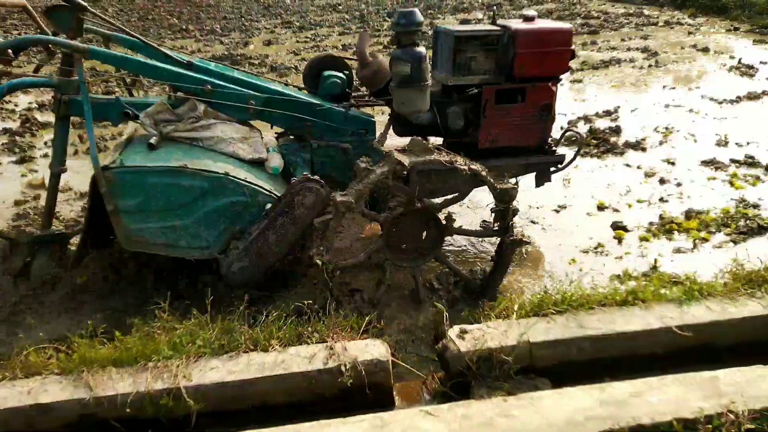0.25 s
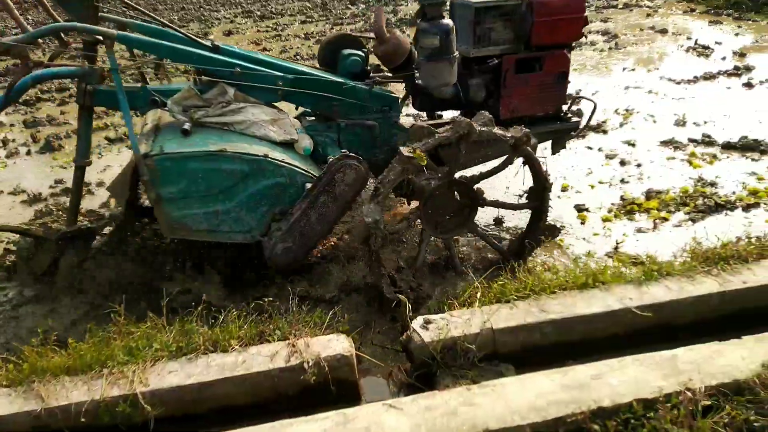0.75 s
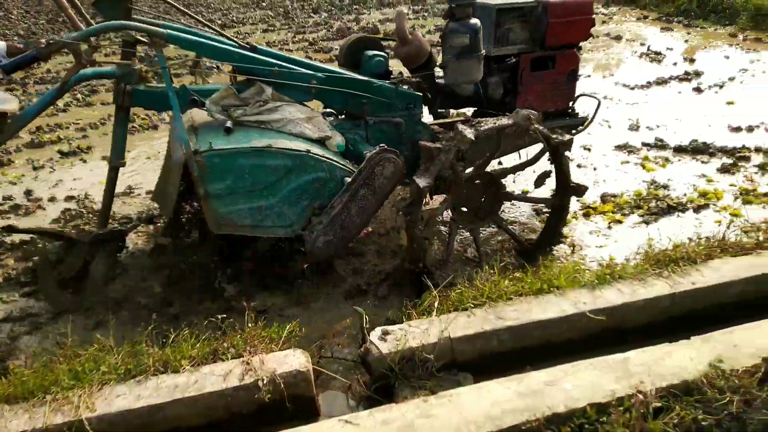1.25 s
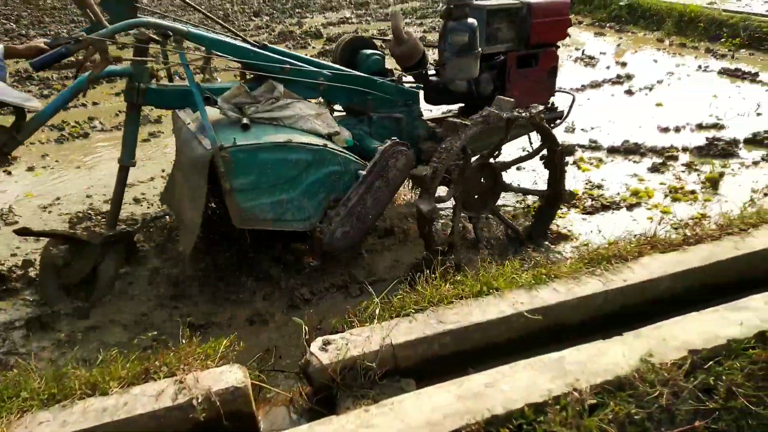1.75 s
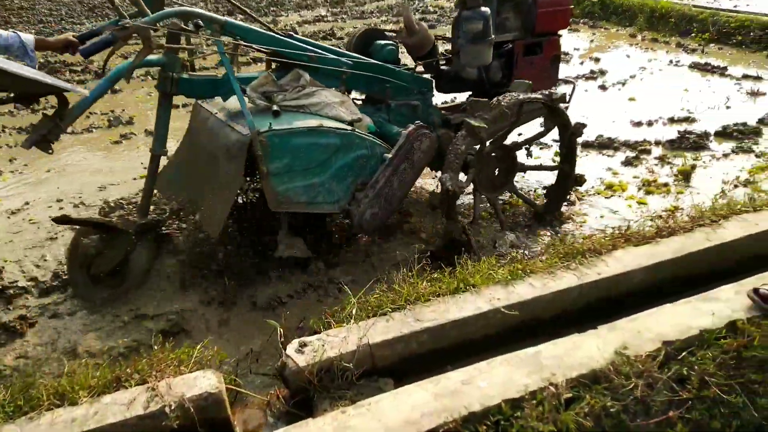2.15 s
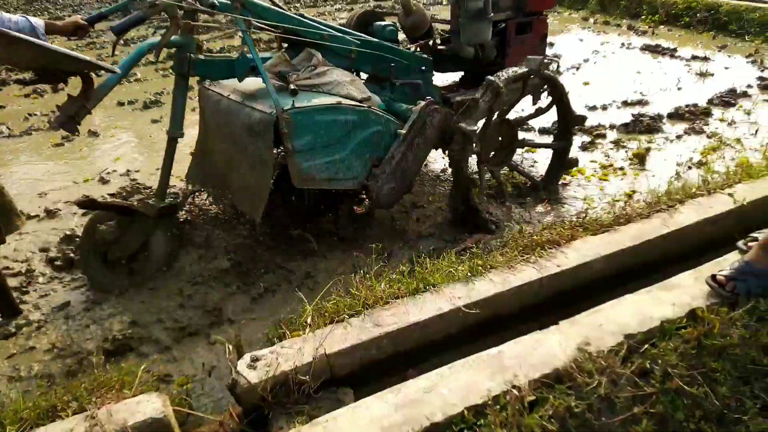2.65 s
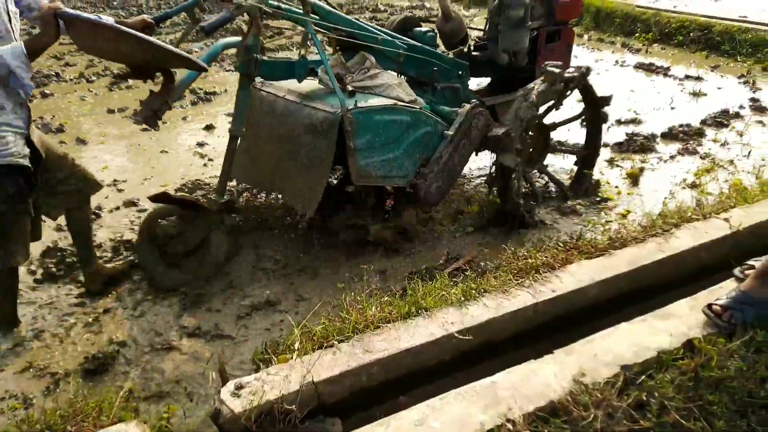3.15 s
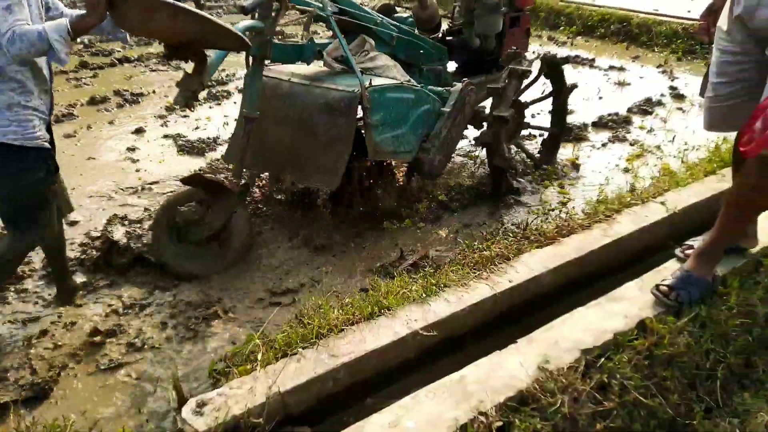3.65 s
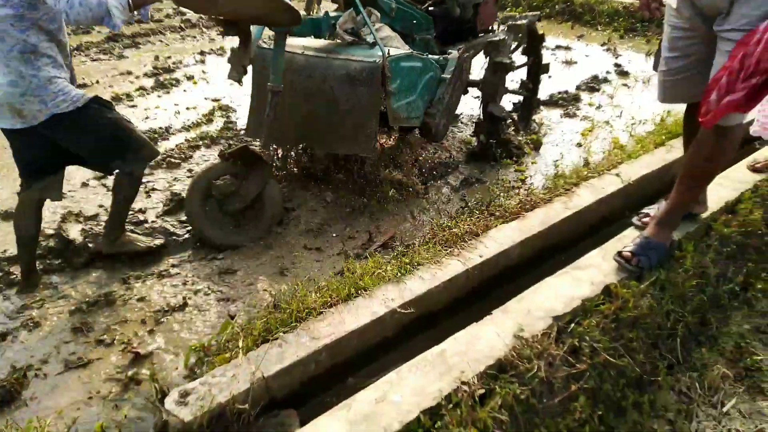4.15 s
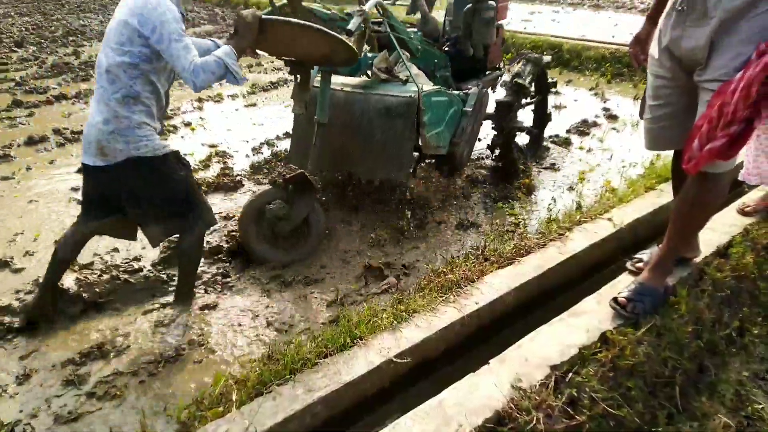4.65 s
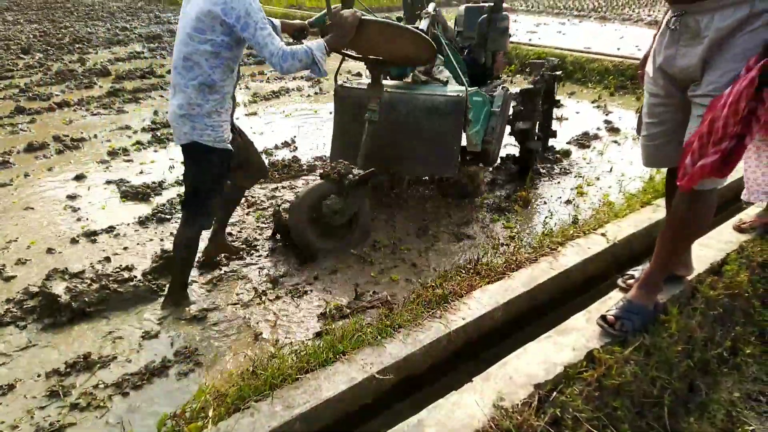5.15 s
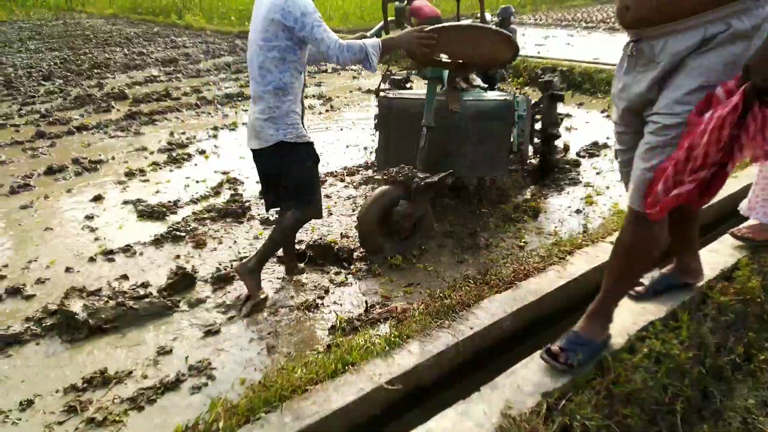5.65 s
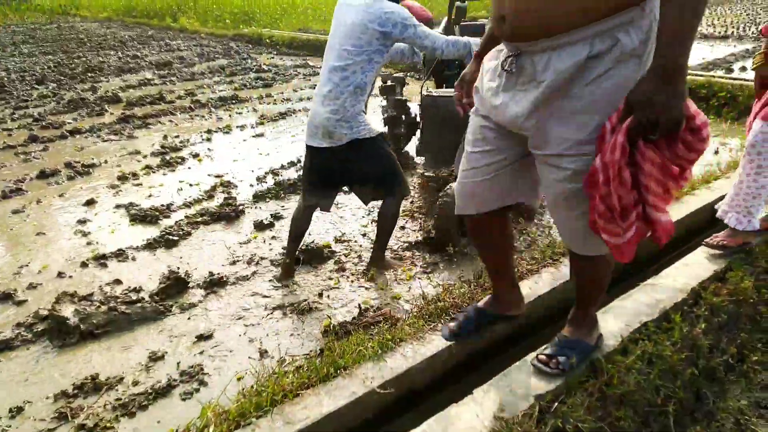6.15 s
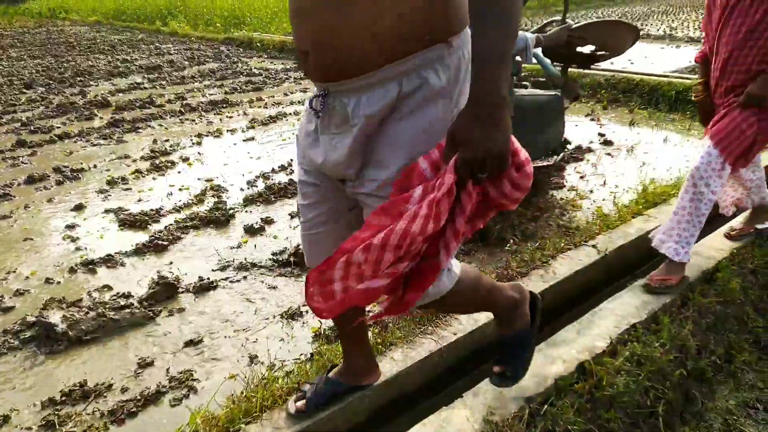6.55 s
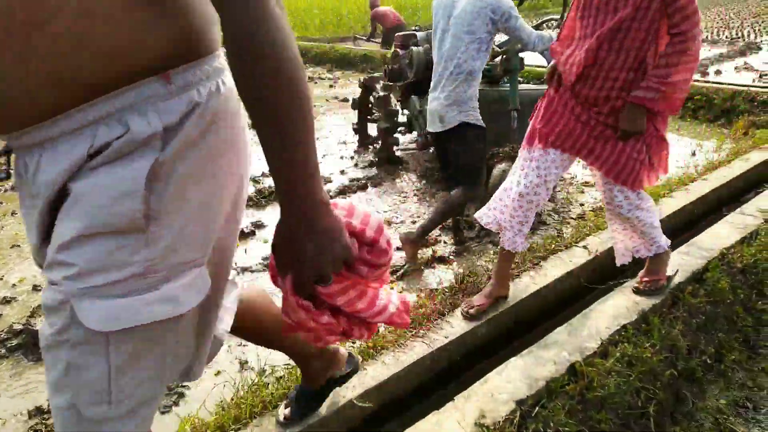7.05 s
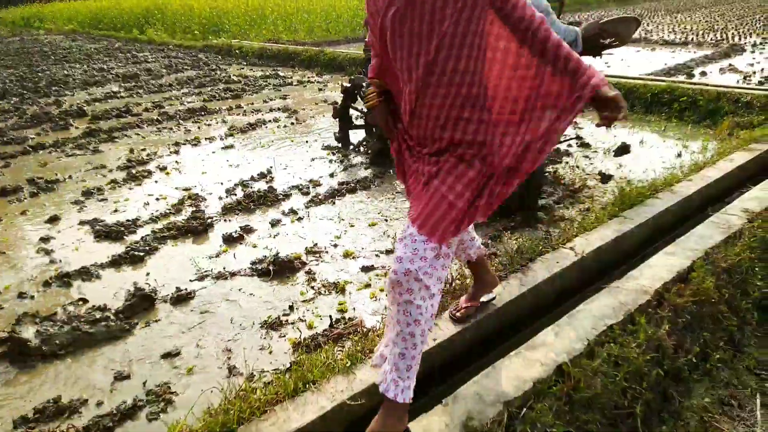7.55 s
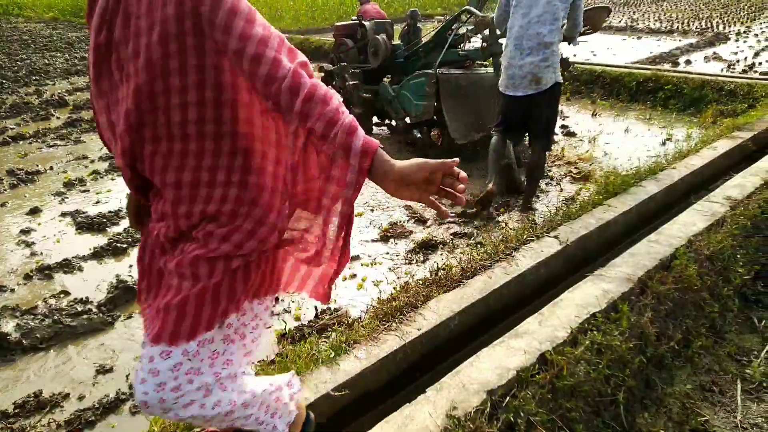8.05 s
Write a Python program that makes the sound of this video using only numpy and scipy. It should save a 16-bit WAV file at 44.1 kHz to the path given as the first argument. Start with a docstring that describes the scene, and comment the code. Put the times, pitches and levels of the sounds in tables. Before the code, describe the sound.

A walk-behind tiller's one-cylinder diesel engine chugs fast and evenly in an open flooded field. Deep exhaust thumps carry a loud metallic clatter, ringing knocks, valve ticks and jingling loose parts over a lumpy rumble. The hand-held microphone starts behind it, jumps to its side, then hears it pass and draw away. The engine speeds up slightly after the middle, the clatter thins a little, and one brief splash comes near the end.

```python
"""A flooded field, worked by a walk-behind tiller with a one-cylinder diesel, heard first from behind,
then beside it, then as it draws away. In each four-stroke cycle gas pulses thump the exhaust and intake,
metal contacts rattle the block and valve gear, and the firing knocks the casing and gear housing.
Loose parts jingle, a lumpy low rumble lies under the thumps, and there is one bright splash.
A hand-held two-port microphone listens from five positions: behind, beside, passing, leaving, far."""
import sys
import numpy as np
from scipy import signal
from scipy.fft import rfft, irfft, next_fast_len
from scipy.io import wavfile
from scipy.ndimage import uniform_filter1d, map_coordinates

SR = 44100
rng = np.random.default_rng(int(sys.argv[2]) if len(sys.argv) > 2 else 0)


def dump_mix(stems):
    """Bounce the given channels to the path in sys.argv[1] as a 16-bit WAV at rate SR."""
    frames = np.atleast_2d(stems).T  # one column per channel
    limited = np.clip(frames, -1, 1)  # hard clip at full scale
    pcm = np.round(limited * 32767).astype(np.int16)
    wavfile.write(sys.argv[1], SR, pcm)


N = 366471
TIME = np.arange(N) / SR
FFT_SIZE = next_fast_len(N + 8192)

# base mix, a row per position: (thump [dB], block [dB], sheet metal [dB], ticking [dB], hiss [dB])
MIX = [(-22.5, -28.5, -28.5, -36.5, -59), (-24, -25.5, -23.5, -36.5, -48.5),
       (-23.5, -26.5, -23.5, -38, -48.5), (-22.5, -28, -25, -40, -51), (-21.5, -30, -28.5, -43, -57)]
# ride on the clatter, dipping as passers-by screen the engine: (time [s], level [dB])
CLATTER_RIDE = [(0, 2.5), (.35, 2.5), (.375, -3), (.46, 1), (2.7, 0), (4.3, -1.5), (5.8, -1.5),
                (6.16, -2.5), (6.41, -2.5), (6.8, -1), (7.0, -1), (7.27, 2), (7.84, 0), (8.2, 3.5),
                (8.31, 4)]
# the clearest knocks: (time [s], level [dB], pitch [Hz], ticking relative to the knock [dB])
CLEAR_KNOCKS = [(0.0813, -20, 2250, -16), (0.2364, -14, 2380, -16), (0.3157, -10.5, 2190, -22),
                (0.4055, -10, 2350, -17), (0.4599, -16, 2260, -18), (0.4838, -10, 2240, -20),
                (0.5637, -7, 2230, -17), (0.6165, -8, 2380, -20), (0.6445, -11, 2350, -22),
                (0.7228, -9, 2330, -16), (0.7752, -11, 2370, -20), (0.8046, -7, 2330, -19),
                (0.8854, -8, 2350, -21), (1.2875, -11, 2210, -19), (1.4462, -12, 2180, -21),
                (1.4651, -12, 2450, -21), (1.5255, -15, 2340, -17), (1.6861, -7, 2180, -21),
                (1.7664, -3.5, 2480, -19), (1.9281, -11, 2300, -20), (2.413, -14, 2540, -17),
                (2.4838, -7, 2320, -12), (2.6958, -10, 2400, -19), (2.8111, -10, 2350, -19),
                (2.8884, -13, 2450, -17), (2.9697, -13, 2330, -19), (3.1318, -10.5, 2480, -21),
                (3.2096, -9, 2540, -19), (3.2895, -9.5, 2310, -19), (3.3703, -14, 2500, -19),
                (3.5309, -11, 2430, -21), (3.7614, -9, 2250, -20), (3.8537, -9, 2390, -19),
                (3.938, -9, 2280, -20), (4.0009, -7, 2400, -22), (4.16, -5, 2520, -24),
                (4.1794, -13, 2280, -19), (4.2328, -11, 2370, -18), (4.2593, -7.5, 2340, -22),
                (4.6294, -11, 2390, -18), (4.6983, -9.5, 2390, -24), (4.827, -14, 2430, -18),
                (5.0624, -11, 2306, -18), (5.2186, -9.5, 2280, -14), (5.2964, -9.5, 2280, -20),
                (5.4511, -9, 2240, -18), (5.6047, -11.5, 2250, -25), (5.8347, -12, 2350, -27),
                (6.0637, -9.5, 2360, -20), (6.2178, -13, 2240, -23), (6.7531, -20, 2360, -22),
                (7.1357, -13, 2310, -18), (7.2924, -15, 2310, -19), (7.3687, -13, 2320, -13),
                (7.4465, -11, 2350, -11), (7.5293, -12, 2230, -22), (7.6007, -11, 2240, -24),
                (7.678, -8, 2224, -24), (7.7553, -8.5, 2440, -24), (7.8326, -16, 2340, -21),
                (7.91, -13, 2310, -20), (7.9868, -17, 2250, -13), (8.1414, -7, 2330, -11),
                (8.2198, -12, 2350, -16)]
# the microphone ports differ in colour: (frequency [Hz], left minus right [dB])
PORT_TILT = [(60, -1.0), (92, -1.0), (140, -1.5), (210, -2.5), (330, -1.5), (500, -2), (770, -3.5),
             (1170, -7), (1790, -12.5), (2740, -8.5), (4190, 0.5), (6410, -9), (9810, 2.5), (15000, 11)]
# the left port leads beside the engine: (frequency [Hz], phase [rad])
LEFT_LEAD = [(900, -.1), (1250, -.1), (1800, .6), (2400, 1.2), (3000, 2.4), (5500, 3)]


def exhaust_thumps():
    """Gas pulses ring the silencer and block, a little differently in every cycle."""
    # silencer and block modes: (frequency [Hz], t60 [s])
    modes = [(71, 0.108), (126, 0.039), (171, 0.039), (230, 0.043), (276, 0.14), (319, 0.075), (381, 0.043),
             (430, 0.05), (698, 0.045)]
    # gas pulses at each position: (phase [cycles], then a signed push on each mode [gain]); the rows are
    # combustion, exhaust opening, its inverted return from the open pipe end, valve overlap, intake closing
    behind = [(-0.367, 0.02, -0.04, -0.03, -0.03, -0.04, 0.06, 0.01, 0, 0.07),
              (-0.109, -0.2, 0.15, 0.11, 0.05, 0.0, 0.09, 0.01, 0, -0.03),
              (-0.072, 0.2, -0.22, 0.04, -0.03, -0.02, -0.1, 0.0, 0, 0.01),
              (0.172, -0.07, -0.1, 0.11, 0.07, 0.02, -0.01, -0.01, 0, 0),
              (0.455, -0.01, -0.11, -0.04, 0.04, 0, 0, -0.02, 0, 0)]
    beside = [(-0.367, 0.0, 0.02, -0.01, -0.06, 0.02, -0.01, -0.02, -0.03, 0.0),
              (-0.109, -0.2, 0.19, 0.11, 0.06, -0.01, 0.09, -0.15, 0.0, -0.05),
              (-0.072, 0.11, -0.01, 0.07, -0.04, 0.0, -0.07, 0.08, 0.03, 0.04),
              (0.172, 0.03, 0.02, -0.12, 0.08, -0.01, 0.03, 0.04, -0.04, -0.01),
              (0.455, 0.04, 0.02, -0.07, -0.12, 0.03, 0.0, 0.01, 0.0, -0.01)]
    passing = [(-0.367, 0.01, -0.01, 0.0, -0.08, -0.01, -0.02, -0.06, 0.02, 0.01),
               (-0.109, -0.16, -0.01, 0.29, -0.01, 0.0, 0.05, -0.01, 0.0, -0.01),
               (-0.072, 0.15, -0.23, 0.24, -0.05, 0.01, -0.02, 0.01, 0.03, -0.01),
               (0.172, 0.01, -0.01, -0.03, 0.05, 0.0, 0.03, 0.11, -0.03, -0.01),
               (0.455, 0.03, -0.05, -0.03, -0.11, 0.04, 0.0, 0.0, 0.0, 0.01)]
    leaving = [(-0.367, 0.0, -0.01, -0.04, -0.03, -0.01, -0.02, 0.0, 0.0, 0.0),
               (-0.109, -0.24, -0.15, 0.54, -0.03, -0.05, -0.07, 0.1, -0.07, -0.04),
               (-0.072, 0.19, -0.22, 0.37, -0.02, 0.03, 0.06, -0.06, -0.01, 0.02),
               (0.172, -0.02, -0.15, 0.13, 0.1, -0.03, 0.02, 0.03, -0.06, 0.01),
               (0.455, 0.03, -0.07, -0.08, 0.02, 0.01, -0.01, -0.02, -0.01, -0.01)]
    far = [(-0.367, -0.01, -0.01, -0.08, 0.03, 0.01, 0.05, -0.02, -0.02, 0.01),
           (-0.109, -0.17, -0.12, 0.35, 0.08, -0.01, -0.03, 0.04, -0.08, -0.01),
           (-0.072, 0.18, -0.27, 0.24, -0.04, -0.01, 0.02, -0.09, 0.03, 0.02),
           (0.172, -0.04, -0.15, 0.17, 0.18, -0.01, 0.0, -0.01, -0.05, 0.01),
           (0.455, 0.02, -0.16, -0.06, 0.09, -0.01, 0.0, 0.01, -0.02, 0.0)]
    # tone of the thumps, with a lift in the low mids: (frequency [Hz], gain [dB])
    tone = [(70, 0), (130, 1), (230, 2), (320, 3.5), (400, 1.5), (470, -1), (530, -3), (700, 3.5)]
    firing_spread_db, mode_spread_db = [.6, 1.2, 1.3, .8, .4], .4  # per position; per mode and pulse
    firing_db = firing_spread_db @ position_mix(TIME) * wobble(11)
    strikes, t = np.zeros((len(modes), N)), TIME[:SR // 5]
    for pulse in np.stack([behind, beside, passing, leaving, far], axis=1):
        times = cycle_times(pulse[0, 0])
        scatter = rng.standard_normal((len(times), len(modes) + 1))
        times = times + .0001 * scatter[:, 0]
        push_db = mode_spread_db * scatter[:, 1:] + np.interp(times, TIME, firing_db)[:, None]
        pushes = position_mix(times).T @ pulse[:, 1:] * amp(push_db)
        strikes += [impulses(times, push) for push in pushes.T]
    rings = [damped_sine(hz, t60, t) for hz, t60 in modes]
    thumps = signal.oaconvolve(strikes, rings, axes=1).sum(0)[:N]
    thumps = signal.lfilter(*signal.butter(2, 50, "high", fs=SR), thumps)
    thumps = filtered(thumps, lambda hz: port_gains(hz) * amp(along(tone, hz)))
    return levelled(thumps, layer_levels()[0])


def contact_envelopes():
    """Metal contacts swell four bands in every cycle: block, sheet metal, ticking and hiss."""
    # contacts: (phase [cycles], t60 [s], then each band's level over the steady rattle [dB])
    contacts = [(-.31, 0.068, 8, 8, 7.5, 4), (-.085, 0.02, 6, 7.5, 7, -11), (.17, 0.064, -5, -8, 4, 6),
                (.35, 0.024, 7, 5, -15, -9), (.47, 0.055, 3, -28.5, -19, 2)]
    # the firing carries far, the valve gear less; a row per contact: (gain at each position [dB])
    facing = [(0, -2.5, -2, -1.2, 1), (0, 0, -0.5, -1.4, -3), (0, 1, 0, -0.088, -0.5), (0, 0, -1, -1, 0.5),
              (0, 0, 0, 0, 4.5)]
    # once the tiller has turned away; a row per contact: (change in each band [dB])
    turned = [(-5, -1, -1, -3), (-4, -3, -5, -.1), (-8, -17, -6, 1.5), (-3, -0.5, 12, -.1),
              (-2.5, .1, .1, 0)]
    # the sharpest valve ticks: (time [s], peak [dB])
    valve_ticks = [(0.278, -34), (0.4424, -35), (1.0026, -36), (1.3246, -40), (1.4047, -39), (1.7255, -35),
                   (1.8068, -38), (3.5675, -36), (3.8911, -42), (3.9714, -40), (5.254, -40), (5.4864, -36)]
    power = amp([1.1 * wobble(30) + 1.2 * wobble(7) for _ in range(4)])
    for (phase, t60, *band_db), facing_db, turned_db in zip(contacts, facing, turned):
        times = contact_times(phase)
        position = position_mix(times)
        scatter = rng.standard_normal((len(times), 6))
        hit_db = band_db + np.outer(position[3:].sum(0), turned_db) + (facing_db @ position)[:, None]
        hit_db += .6 * (scatter[:, :1] + scatter[:, 2:])
        times = times + .0004 * scatter[:, 1]
        power += [decay(impulses(times, hits), t60 / 2) for hits in amp(2 * hit_db).T]
    # all but the hiss duck just before the firing
    lull_times, lull_s, lull_db = contact_times(-.4), .009, -4
    lull_shape = np.hanning(round(lull_s * SR)) ** .5
    lull = signal.oaconvolve(impulses(lull_times, np.ones(len(lull_times))), lull_shape)[:N]
    power[:3] *= amp(2 * lull_db * lull)
    block, sheet, ticking, hiss = [levelled(np.sqrt(band)[None], db)[0]
                                   for band, db in zip(power, layer_levels()[1:])]
    # clear knocks set off extra rattle; valve ticks spike the hiss
    times, knock_db, _, ticking_db = np.transpose(CLEAR_KNOCKS)
    sheet = np.hypot(sheet, decay(impulses(times, amp(knock_db - 16)), t60=.056))
    ticking = np.hypot(ticking, decay(impulses(times, amp(knock_db + ticking_db - 11)), t60=.025))
    times, tick_db = np.transpose(valve_ticks)
    hiss = np.hypot(hiss, decay(impulses(times, amp(tick_db - 3)), t60=.02))
    return block, sheet, ticking, hiss


def engine_rattle():
    """Block, sheet metal and valve gear rattle: bands of noise pulsing with the metal contacts."""
    # rattle colour at each position, notched by the echo off the water: (frequency [Hz], level [dB])
    colours = [
        [(240, -47), (400, -9), (450, -7), (650, -2), (960, -8.5), (1300, -10.5), (1800, -6), (2280, 2),
         (2800, -11.5), (4200, -24.5), (5200, -33.5), (7000, -44), (9100, -54), (15400, -120)],
        [(240, -33), (400, -7), (462, -1), (527, -20), (601, -7), (661, -7.5), (755, 0.5), (936, -3),
         (1310, -11.5), (1620, -9), (1990, -3.5), (2410, -0.5), (2850, -15.5), (4950, -27), (7000, -41.5),
         (9100, -54), (15400, -120)],
        [(240, -32), (400, -3.5), (496, -16), (773, 2), (882, -1), (959, -0.5), (1200, -11), (1360, -13.5),
         (1640, -3.5), (2040, -3.5), (2380, 0), (2960, -14), (3450, -23), (3850, -18.5), (4250, -23.5),
         (4950, -25), (7000, -39), (9100, -77), (15400, -120)],
        [(240, -24), (400, -6), (473, -13), (502, -16.5), (719, -2.5), (1010, -7.5), (1090, -6.5), (1570, -16),
         (1770, -6), (2240, -2), (2650, -11), (3100, -19.5), (3490, -24.5), (4890, -29), (7000, -41),
         (9100, -81), (15400, -120)],
        [(240, -37), (400, -1.5), (446, -10), (496, -9), (540, -16.5), (728, -2.5), (903, -2), (1130, -10),
         (1320, -10), (1600, -14.5), (2300, -2), (2820, -11), (3140, -19), (3850, -20.5), (7000, -37),
         (9100, -89), (15400, -120)],
    ]
    # sheet metal resonances: (frequency [Hz], width [Hz], gain [dB])
    resonances = [(2205, 27, -1), (2327, 29, 5), (2420, 230, 2), (2460, 42, 2.5)]
    # colour of the hiss: (frequency [Hz], level [dB])
    hiss_colour = [(6500, -30), (7300, -10), (8200, -17), (9000, -13), (9800, 0), (12000, -1), (15000, -3),
                   (15700, -6)]
    noise = rng.standard_normal((2, N))
    views = [unit(at_ports(noise, colour, lead)) for colour, lead in zip(colours, [.55, 1, 1, 1, .54])]
    steady = np.sum(np.sqrt(position_mix(TIME))[:, None] * views, 0)
    hiss = at_ports(rng.standard_normal((2, N)), hiss_colour)
    *envelopes, hiss_envelope = contact_envelopes()
    out = hiss_envelope * hiss / np.std(hiss.mean(0))

    def ring(hz):
        return 1 + sum((amp(db) - 1) / (1 + (2 * (hz - centre) / width) ** 2)
                       for centre, width, db in resonances)

    edges_hz = [0, 1500, 3300, SR]
    for envelope, low, high in zip(envelopes, edges_hz, edges_hz[1:]):
        rolloff = lambda hz: np.sqrt((1 + (low / (hz + 1)) ** 16) * (1 + (hz / high) ** 16))
        band = filtered(steady, lambda hz: ring(hz) / rolloff(hz))
        # so many parts rattle together that chance swells partly even out
        swells = np.abs(uniform_filter1d(np.mean(band ** 2, 0), round(.004 * SR)))
        band = band / (swells + .1 * np.var(band)) ** .15
        slow_rms = np.sqrt(uniform_filter1d(band.mean(0) ** 2, SR // 2))
        out += envelope * band / slow_rms
    return out


def casing_knocks():
    """Each firing rings the casing modes at new strengths; the clearest knocks have their own pitch."""
    # casing modes: (frequency [Hz], level [dB], t60 [s])
    modes = [(1920, -16, .015), (2220, -13, 0.023), (2330, 1, 0.047), (2384, -2, 0.017), (2510, -9, 0.028),
             (2980, -5, 0.017), (3350, -12, 0.011), (3750, -15, 0.014)]
    # how much the usual knock stands out: (gain at each position [dB])
    bite = [-13, -3.5, -10, -1, 2]
    usual_hz, over_sheet_db, ride_depth = 2340, 12, 2.3
    clear = np.array(CLEAR_KNOCKS)[:, :3]
    firings = contact_times(-.305)
    gap_s = np.abs(firings[:, None] - clear[:, 0]).min(1)
    firings = firings[gap_s > .008]  # a clear knock takes the firing's place
    usual_db = (np.transpose(MIX)[2] + bite) @ position_mix(firings) + over_sheet_db
    usual_db += ride_depth * np.interp(firings, *np.transpose(CLATTER_RIDE))
    usual_db += .8 * rng.standard_normal(len(firings))
    usual = np.c_[firings, usual_db, np.full(len(firings), usual_hz)]
    out, t = np.zeros(N + SR), TIME[:SR // 16]
    attack = 1 - np.exp(-(t / .0012) ** 2)
    for start, knock_db, pitch in [*usual, *clear]:
        ring = sum(amp(db + rng.normal(0, .9))
                   * damped_sine(hz * pitch / usual_hz * rng.normal(1, .004), t60, t)
                   for hz, db, t60 in modes)
        out[round(start * SR):][:len(t)] += amp(knock_db - 6) * ring * attack  # room for the summed modes
    return filtered(out[:N], lambda hz: port_gains(hz, lead=.7))


def housing_knocks():
    """Each firing also knocks the hollow gear housing."""
    # housing modes: (frequency [Hz], level [dB], t60 [s])
    modes = [(770, -1, .04), (843, -4, 0.046), (962, -1.5, 0.034)]
    # strength of the blow: (level at each position [dB])
    blow_db = [-33, -26.5, -19, -26, -29.5]
    times, t = contact_times(-.31), TIME[:SR // 16]
    attack = 1 - np.exp(-t / .0011)
    out = np.zeros(N)
    for hz, db, t60 in modes:
        blows = amp(blow_db @ position_mix(times) + db + 1.5 * rng.standard_normal(len(times)))
        out += signal.oaconvolve(impulses(times, blows), damped_sine(hz, t60, t) * attack)[:N]
    return filtered(out, port_gains)


def frame_chinks():
    """Loose parts of the frame jingle: short high pings, a few clear ones among many strewn at random."""
    # the clearest chinks: (time [s], level [dB], pitch [Hz])
    clear = [(0.0189, -23, 3540), (0.16, -27, 3680), (0.285, -16, 3580), (0.5003, -21, 3800),
             (0.6853, -25, 3760), (0.844, -26, 4180), (1.0829, -24, 3770), (1.1263, -23, 3480),
             (1.3663, -26, 3700), (1.5249, -21, 3740), (1.6107, -17, 3600), (2.0482, -21, 3600),
             (2.247, -27, 3780), (2.2922, -27, 3970), (2.4124, -23, 4020), (2.483, -21.5, 4800),
             (2.9706, -29, 3940), (3.8524, -27, 3660), (4.378, -24, 3820), (4.6558, -23, 3940),
             (4.957, -13, 3030), (5.162, -18, 2800), (5.36, -13, 2400), (7.0582, -24, 3500)]
    count, over_ticking_db, db_per_khz, t60 = 250, 8, -4, .018
    when, strength, height, _ = rng.random((count, 4)).T
    times, khz_up = when * TIME[-1], 2.2 * height
    db = np.interp(times, TIME, layer_levels()[3]) + over_ticking_db
    db += db_per_khz * khz_up - 1.5 * np.log(strength)
    strewn = np.c_[times, db, 3300 + 1000 * khz_up]
    times, db, hz = np.r_[strewn, clear].T[..., None]
    t = TIME[:SR // 40]
    pings = amp(db) * damped_sine(hz, t60, t) * (1 - np.exp(-t / .00069))
    samples = (times * SR).astype(int) + np.arange(len(t))
    pan = rng.uniform(-1, 1, times.shape)
    return np.array([np.bincount(samples.ravel(), (pings * gain).ravel(), N + SR)[:N]
                     for gain in (1 + pan, 1 - pan)])


def low_rumble():
    """A lumpy low rumble under the engine's thumps."""
    # colour of the rumble: (frequency [Hz], level [dB])
    colour = [(25, -34), (60, -7.5), (110, -3), (160, -2), (240, -3), (330, -4.5), (410, -5), (470, -11.5),
              (520, -25), (600, -42)]
    # loudness of the rumble: (level at each position [dB])
    rumble_db = [-34, -31.5, -31, -33, -34]
    rumble = unit(at_ports(rng.standard_normal((2, N)), colour))
    return rumble * amp(rumble_db @ position_mix(TIME) + 1.45 * wobble(2.83) + 2 * wobble(18))


def splash():
    """A short wet burst, mostly treble."""
    # the splash: (time [s], level [dB], t60 [s])
    burst = (6.875, -37, 0.17)
    start, db, t60 = burst
    # colour of the spray: (frequency [Hz], level [dB])
    colour = [(2500, -30), (4000, -10), (5500, 2), (7000, -9), (9000, -16), (11000, -7), (15000, -25)]
    spray = filtered(rng.standard_normal((2, N)), lambda hz: amp(along(colour, hz)))
    envelope = uniform_filter1d(decay(impulses(np.array([start]), [1]), t60), SR // 60)
    return amp(db) * unit(spray) * envelope


def cycle_times(phase):
    """Times at which the engine passes this phase of each four-stroke cycle."""
    # engine speed, picking up as the load eases: (time [s], rate [cycles/s])
    speed = [(0, 12.768), (.385, 12.768), (.385, 12.481), (.8, 12.476), (1.2, 12.467), (1.5, 12.417),
             (1.8, 12.54), (2.05, 12.392), (2.35, 12.433), (2.65, 12.596), (2.9, 12.565), (3.1, 12.468),
             (3.6, 12.386), (4.1, 12.418), (4.4, 12.37), (4.8, 12.508), (5.0, 12.363), (5.2, 12.894),
             (5.4, 13.002), (5.75, 13.061), (6.1, 13.109), (6.4, 13.08), (6.8, 13.011), (7.1, 12.903),
             (7.4, 12.997), (7.7, 12.945), (8.31, 12.853)]
    start_phase, cut_s, skip_cycles = .669, .385, .126  # the beat skips at an abrupt cut to a new position
    cycles = start_phase + np.cumsum(automation(speed)) / SR - skip_cycles * (TIME > cut_s)
    cycles = np.maximum.accumulate(cycles)
    whole = np.arange(np.ceil(cycles[0] - phase), cycles[-1] - phase)
    return np.interp(whole + phase, cycles, TIME)


def contact_times(phase):
    """Times at which a metal contact at this phase of the cycle is heard."""
    # the block is heard later than the pipe: (delay at each position [s])
    lag = [.002, .0005, .001, .002, .002]
    times = cycle_times(phase)
    return times + lag @ position_mix(times)


def position_mix(times):
    """Crossfade weights of the five listening positions at these times."""
    # listening position: (time [s], position [0 behind, 1 beside, 2 passing, 3 leaving, 4 far behind])
    path = [(0, 0), (.37, 0), (.385, 1), (1.8, 1), (3.2, 2), (4.7, 2), (5.4, 3), (5.9, 3), (6.6, 4)]
    position = np.interp(times, *np.transpose(path))
    return np.clip(1 - np.abs(position - np.arange(5)[:, None]), 0, 1)


def layer_levels():
    """Levels in dB of thump, block, sheet metal, ticking and hiss over time."""
    # how strongly the layers follow the clatter ride: (depth for each layer [factor])
    ride_depth = [0, .3, 1, 1.3, 1.8]
    return np.transpose(MIX) @ position_mix(TIME) + np.outer(ride_depth, automation(CLATTER_RIDE))


def port_gains(hz, lead=0):
    """Left and right port responses, with this share of the left port's phase lead."""
    left = amp(along(PORT_TILT, hz) / 2) * np.exp(.5j * lead * along(LEFT_LEAD, hz))
    return np.array([left, 1 / left])


def at_ports(noise, colour, lead=0):
    """Two unrelated noises, coloured and blended as the ports hear them: narrow lows, wide highs."""
    # likeness of the two ports: (frequency [Hz], coherence [0-1])
    likeness = [(40, .85), (100, .97), (250, .99), (500, .96), (900, .97), (1300, .85), (1800, .65),
                (2400, .64), (3300, .45), (4700, .2), (10000, .05)]
    hz = np.fft.rfftfreq(FFT_SIZE, 1 / SR)
    width = np.arccos(np.clip(along(likeness, hz), 0, 1)) / 2
    left, right = port_gains(hz, lead)
    gain = amp(along(colour, hz)) * 2 / np.abs(left + right).clip(1)
    mid, side = rfft(noise, FFT_SIZE) * [np.cos(width), np.sin(width)] * gain
    return irfft([(mid + side) * left, (mid - side) * right], FFT_SIZE)[:, :N]


def amp(db):
    return 10 ** (np.asarray(db) / 20)


def unit(x):
    return x / np.sqrt(np.mean(x ** 2) + 1e-20)


def along(points, hz):
    """A curve through (frequency [Hz], value) points on a log axis."""
    freqs, values = np.transpose(points)
    return np.interp(np.log(hz + 1), np.log(freqs + 1), values)


def automation(points):
    """One value per sample from (time [s], value) points."""
    return np.interp(TIME, *np.transpose(points))


def wobble(rate):
    """A smooth random curve, rate knots a second."""
    coarse = TIME[::32]
    knots = rng.standard_normal(int(N * rate / SR) + 4)
    return np.interp(TIME, coarse, map_coordinates(knots, [coarse * rate]))


def filtered(x, response):
    """x through a complex response of frequency."""
    return irfft(rfft(x, FFT_SIZE) * response(np.fft.rfftfreq(FFT_SIZE, 1 / SR)), FFT_SIZE)[..., :N]


def impulses(times, sizes):
    return np.bincount(np.clip(np.round(times * SR).astype(int), 0, N - 1), sizes, N)


def damped_sine(hz, t60, t):
    return np.sin(2 * np.pi * hz * t) * amp(-60 * t / t60)


def decay(x, t60):
    """Every impulse rises within four milliseconds and dies away."""
    return uniform_filter1d(signal.lfilter([1], [1, -amp(-60 / (t60 * SR))], x), SR // 250)


def levelled(x, level_db):
    """x with its half-second rms riding level_db."""
    return x * amp(level_db) / np.sqrt(np.abs(uniform_filter1d(np.mean(x ** 2, 0), SR // 2)) + 1e-12)


def scene():
    """The tiller over a low rumble, with one splash."""
    tiller = exhaust_thumps() + engine_rattle() + casing_knocks() + housing_knocks() + frame_chinks()
    return tiller + low_rumble() + splash()


def record(dry):
    """The microphone rounds off peaks near full scale, colours the treble and cuts the very top."""
    # treble colour: (frequency [Hz], gain [dB])
    treble = [(4200, 0), (5500, -0.5), (6400, -6), (7600, -6), (9000, -0.5), (9800, -1.5)]
    ceiling, top_hz = .95, 15746
    rounded = dry / (1 + np.abs(dry / ceiling) ** 4) ** (1 / 4)
    return filtered(rounded, lambda hz: amp(along(treble, hz)) * (hz < top_hz))


dry = scene()
out = record(dry)
dump_mix(out)
```